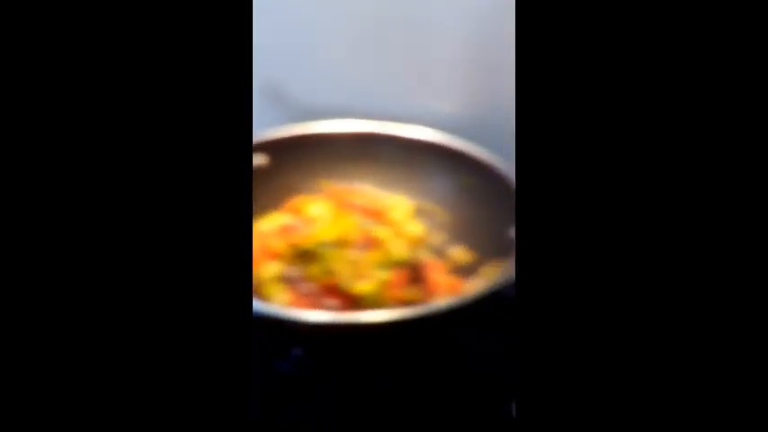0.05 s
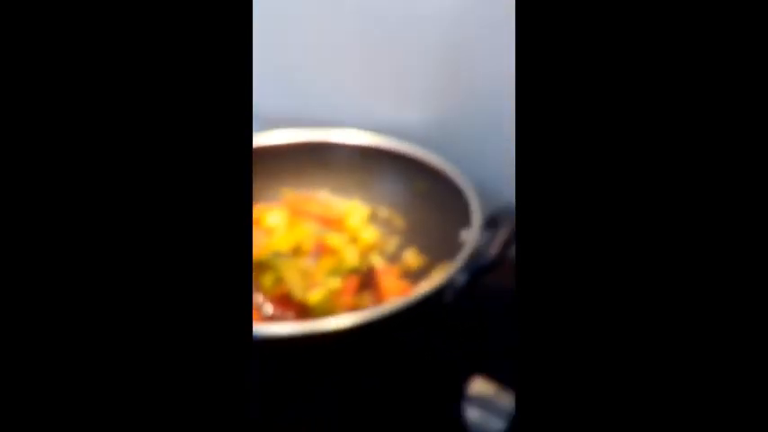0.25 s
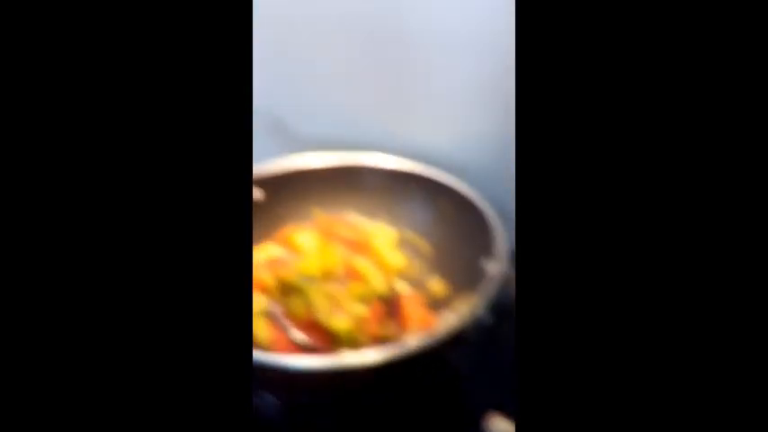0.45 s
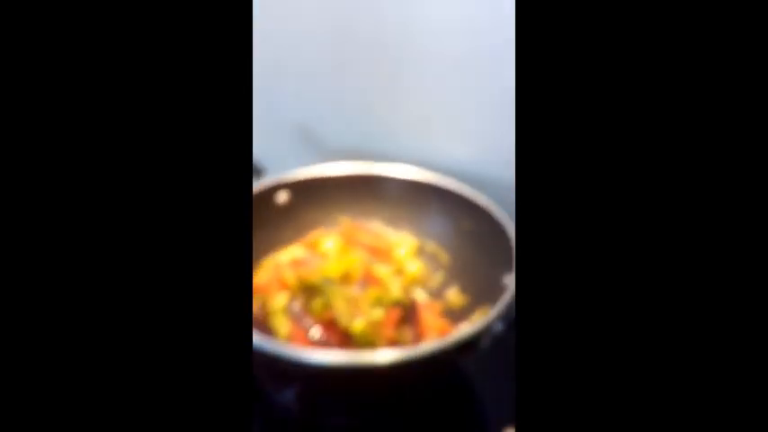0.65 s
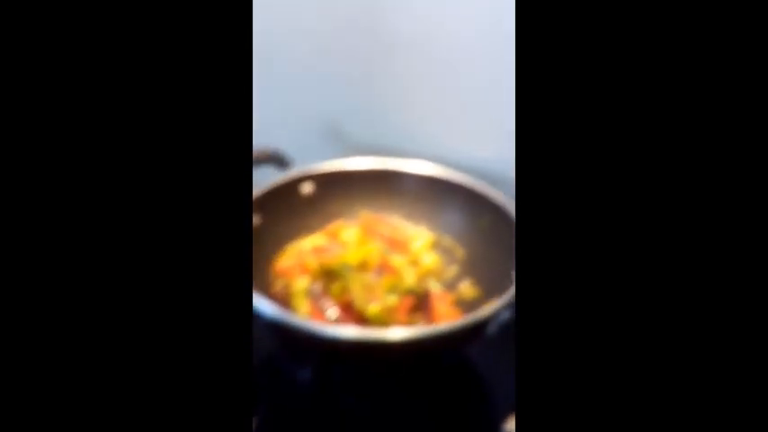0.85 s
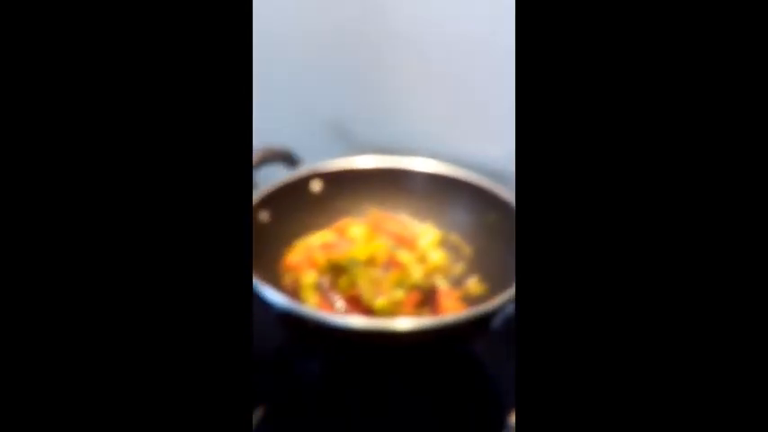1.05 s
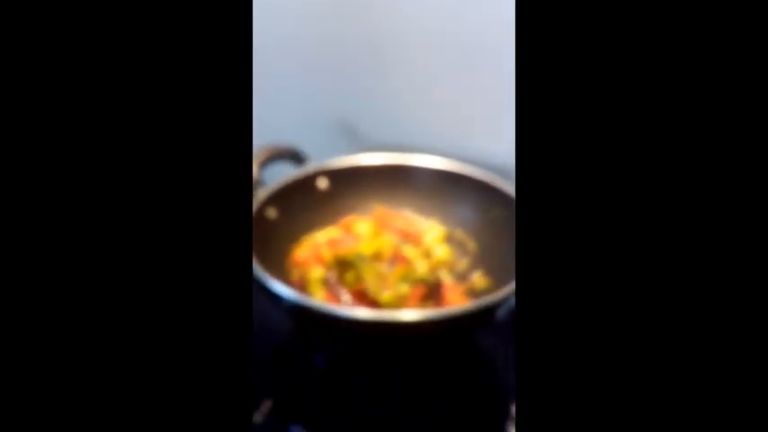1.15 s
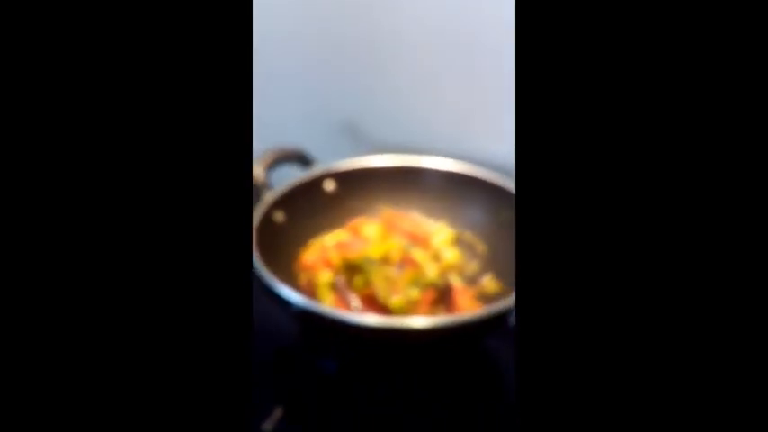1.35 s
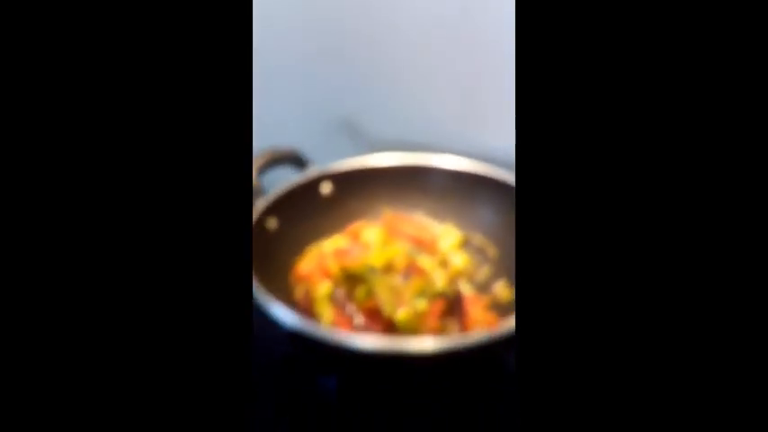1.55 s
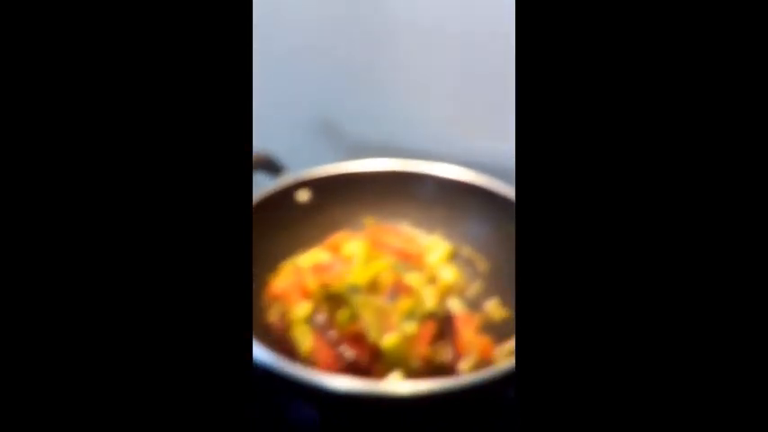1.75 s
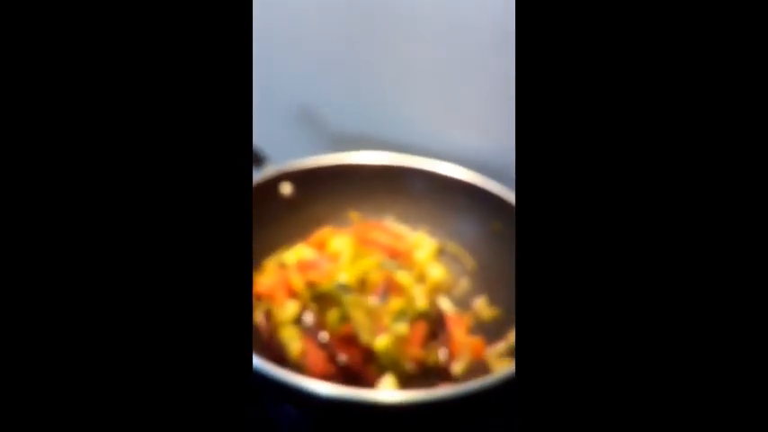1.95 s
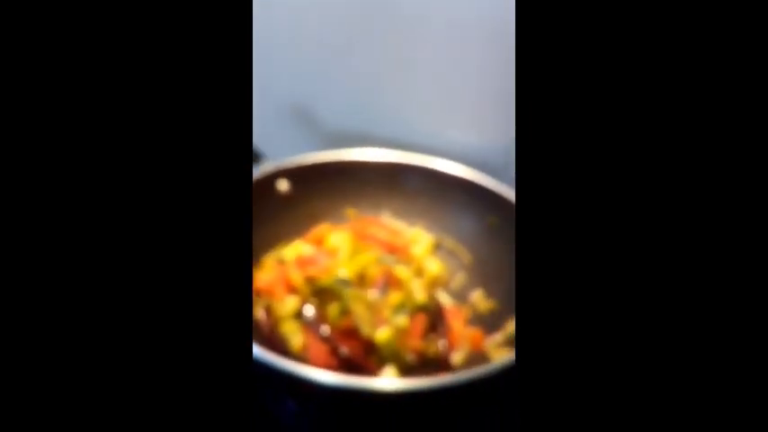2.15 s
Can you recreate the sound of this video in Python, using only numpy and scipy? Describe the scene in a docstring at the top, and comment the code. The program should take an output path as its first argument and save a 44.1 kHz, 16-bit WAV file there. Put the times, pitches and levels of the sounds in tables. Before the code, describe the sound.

Over quiet steady frying and a low burner flutter, a metal lid strikes the pan early, clattering and ringing for about half a second, then a small oil spit and soft scuffs, in a small, live kitchen.

```python
"""In a small kitchen, a steel lid clangs on the rim of a pan: one edge lands, then the other, and the metal rings.
The clang mixes short bursts of noise with many fading sine waves, and the room answers each hit.
Vegetables sizzle steadily (noise plus tiny pops) over the low flutter of the burner (deep noise).
The oil spits once, as three quick bursts, and a few soft scuffs swell up as narrow bands of noise.
The two microphone ports differ in colour: the left one hears more of the sizzle band."""
import sys
import numpy as np
from scipy import signal
from scipy.fft import rfft, irfft, next_fast_len
from scipy.io import wavfile
from scipy.ndimage import uniform_filter1d, minimum_filter1d, map_coordinates

SR = 44100
rng = np.random.default_rng(int(sys.argv[2]) if len(sys.argv) > 2 else 0)


def to_wav(sig):
    """Store sig (one row per channel, or 1-D mono) as 16-bit WAV at the path in sys.argv[1].

    Samples outside -1..1 are clipped; the rate is SR.
    """
    pcm = np.clip(np.atleast_2d(sig), -1, 1) * 32767
    pcm = np.round(pcm).astype(np.int16)
    wavfile.write(sys.argv[1], SR, pcm.T)  # frames by channels


N = 97020
TIME = np.arange(N) / SR  # seconds


def amp(db):
    """Turn decibels into a multiplier."""
    return 10 ** (np.asarray(db) / 20)


def unit(x):
    """Scale a sound to an average strength (rms) of 1."""
    return x / np.sqrt(np.mean(x ** 2) + 1e-20)


def along(points, hz):
    """Read a curve of (f/Hz, value) points, with pitch spaced as the ear hears it (log axis)."""
    f, value = np.transpose(points)
    return np.interp(np.log(hz + 1), np.log(f + 1), value)


def over_time(points):
    """Read a curve of (t/s, value) points at every sample."""
    return np.interp(TIME, *np.transpose(points))


def filtered(x, response):
    """Make each frequency stronger or weaker, or shift it, as response(hz) says."""
    size = next_fast_len(N + SR // 2)
    hz = np.fft.rfftfreq(size, 1 / SR)
    return irfft(rfft(x, size) * response(hz), size)[..., :N]


def noise(spectrum):
    """Random hiss coloured by a spectrum, rms 1."""
    return unit(filtered(rng.standard_normal(N), lambda hz: amp(along(spectrum, hz))))


def fade(t, t60):
    """Die away smoothly, losing 60 dB in t60 seconds."""
    return np.exp(-np.log(1000) * t / t60)


def add(out, start_s, x):
    """Mix x into out from start_s seconds on."""
    i = round(start_s * SR)
    out[..., i:i + x.shape[-1]] += x[..., :N - i]


def wobble(rate):
    """A smooth random curve through `rate` random points a second."""
    knots = rng.standard_normal(int(N * rate / SR) + 4)
    return map_coordinates(knots, [np.arange(N) * rate / SR])


def wide(make, side_db):
    """Give the ports a shared sound plus a second one with opposite sign in each."""
    return make() + amp(side_db) * np.outer([1, -1], make())


def lagged(pair, lag_s):
    """The sound reaches the right port first, by lag_s seconds."""
    return filtered(pair, lambda hz: np.exp(1j * np.pi * lag_s * np.outer([-1, 1], hz)))


# how long the room rings at each pitch: f/Hz, t60/s
ROOM_DECAY = [(150, 0.48), (1000, 0.59), (4000, 0.63), (7000, 0.48), (12000, 0.15)]
WALL_DB, WALL_T60 = -6, 0.046  # quick answer of stove top and back wall: relative level/dB, t60/s
ROOM_DB = -4.5  # room level used for spits, scuffs and the sheet metal
PORT_LAG_S, LID_LAG_S = 0.00015, .00001


def kitchen(x, room_db, lag_s):
    """Direct sound, a quick answer from nearby surfaces and a soft random tail for each port."""
    hz, t, z = signal.stft(rng.standard_normal((2, SR * 3 // 4)), SR, nperseg=256)
    decay = fade(t, along(ROOM_DECAY, hz)[:, None])
    tail = signal.istft(z * decay, SR, nperseg=256)[1]
    wall = rng.standard_normal(tail.shape) * fade(np.arange(tail.shape[1]) / SR, WALL_T60)
    answer = tail / np.linalg.norm(tail[0]) + amp(WALL_DB) * wall / np.linalg.norm(wall[0])
    late_answer = np.pad(answer, ((0, 0), (SR // 800, 0)))  # starts about 1/800 s late
    pair = x * np.ones((2, 1))
    wet = signal.fftconvolve(pair, late_answer, axes=1)[:, :N]
    return lagged(pair, lag_s) + amp(room_db) * wet


# colour of the burner's rumble: f/Hz, relative level/dB
BURNER_COLOUR = [(20, -14), (45, -25), (78, 1), (100, -0.5), (125, -6.5), (200, -15.5), (400, -53.5)]
# rise and fall of the burner: t/s, level/dB (before BURNER_DB)
BURNER_COURSE = [(0.0, -66.5), (0.12, -68.5), (0.22, -61), (1.19, -69), (1.25, -69), (1.41, -61),
                 (1.46, -73), (1.59, -61.5), (1.73, -66), (1.82, -60.5), (2.1, -68.5), (2.2, -56.5)]
BURNER_DB, FLUTTER_DB = 0.5, 1


def burner(side_db=-8):
    """A low fluttering rumble of deep noise, nearly alike in both ports."""
    level_db = BURNER_DB + over_time(BURNER_COURSE) + FLUTTER_DB * wobble(7.8)
    return amp(level_db) * wide(lambda: noise(BURNER_COLOUR), side_db)


# colour of the sizzle: f/Hz, relative level/dB
SIZZLE_COLOUR = [(120, -14), (200, -17), (300, -8), (480, -14.5), (670, -17.5), (850, -14.5), (1260, -8.5),
                 (1550, -12.5), (2250, -4.5), (3400, -3), (4550, 1), (6400, -8.5), (7200, -18.5),
                 (8100, -33), (14000, -36), (15300, -55)]
# slow course of the sizzle: t/s, level/dB (before SIZZLE_DB)
SIZZLE_COURSE = [(0, -53), (.7, -53.5), (1.2, -54.5), (1.7, -53.5), (2.2, -53)]
# how alike the two ports hear it: f/Hz, likeness (1 the same, 0 or less unrelated)
SIZZLE_LIKENESS = [(60, 0.83), (150, 0.54), (380, 0.31), (940, 0.36), (2350, -0.26), (5890, 0.16),
                   (14700, 0.02)]
SIZZLE_DB = -0.5
FIZZ_DB, FIZZ_PER_S = -5.5, 900  # the pops: level against the hiss, average count in each port


def sizzle():
    """Countless tiny bursting bubbles: a hiss with a finer grain of single pops."""
    is_pop = rng.random((2, N)) < FIZZ_PER_S / SR
    pops = is_pop * rng.standard_normal((2, N))
    grain = rng.standard_normal((2, N)) + amp(FIZZ_DB) * unit(pops)

    def shared_and_opposite(hz):
        """Split each pitch into a part shared by the ports and a part opposite in them."""
        turn = np.arccos(np.clip(along(SIZZLE_LIKENESS, hz), 0, 1)) / 2
        return amp(along(SIZZLE_COLOUR, hz)) * [np.cos(turn), np.sin(turn)]

    mid, side = filtered(grain, shared_and_opposite)
    pair = lagged(np.array([mid + side, mid - side]), PORT_LAG_S)
    level_db = SIZZLE_DB + over_time(SIZZLE_COURSE) + 0.11 * wobble(19)
    return amp(level_db) * unit(pair)


# soft scuffs: t/s of the peak, length/s (bell curve), centre f/Hz, width/octaves (bell curve), level/dB
SCUFF_SWELLS = [(1.445, 0.029, 666, 0.16, -70), (1.51, 0.044, 610, 0.19, -67.5),
                (1.472, .035, 4100, 0.13, -57.5), (1.76, 0.044, 1410, 0.44, -63)]


def scuffs():
    """Soft swells of noise, each kept to a narrow band of pitch."""
    out = np.zeros(N)
    for peak_s, length, centre_hz, width, db in SCUFF_SWELLS:
        def narrow(hz):
            octaves = np.log2((hz + 1) / centre_hz)
            return np.exp(-.5 * (octaves / width) ** 2)
        band = filtered(rng.standard_normal(N), narrow)
        swell = np.exp(-.5 * ((TIME - peak_s) / length) ** 2)
        out += amp(db) * unit(band) * swell
    return kitchen(out, ROOM_DB, PORT_LAG_S)


# bursts of oil: t/s, level/dB at the start
SPIT_BURSTS = [(0.7837, -37), (0.7942, -53), (.8001, -47.5)]
# colour of a burst: f/Hz, relative level/dB
SPIT_COLOUR = [(500, -38), (1500, -14), (2300, 9.5), (3200, -10), (4500, 8.5), (6500, -13), (8000, -30),
               (12000, -33), (15000, -51)]
SPIT_T60 = 0.016  # seconds


def spits():
    """Larger drops burst in the hot oil: noise that dies away almost at once."""
    out = np.zeros(N)
    for start_s, db in SPIT_BURSTS:
        add(out, start_s, amp(db) * noise(SPIT_COLOUR) * fade(TIME, SPIT_T60))
    return kitchen(out, ROOM_DB, LID_LAG_S)


RISE_S = 0.00016  # time scale on which a struck sound swells up


def rise(t):
    """The very short swell at the start of a struck sound."""
    return 1 - np.exp(-t / RISE_S)


def bright(hz, tilt_db):
    """A harder contact excites more treble: tilt in dB per octave around 3000 Hz."""
    return amp(tilt_db * np.log2(np.clip(hz, 800, 7000) / 3000))


# contacts of lid and rim, also used by clang: t/s, strength level/dB, treble tilt/(dB per octave)
HITS = [(0.2358, -1.5, 0.5), (0.2468, -2, -4), (0.249, 0.5, -1.5), (.2560, -14, 0)]
# clear ringing tones (modes) of the lid: f/Hz, relative level/dB, t60/s
LID_MODES = [(1006, -7, .4), (1224, -11, .42), (1280, -12, .46), (1399, -11, .46), (1517, -9, .48),
             (2267, 5, .27), (2514, -5, .3), (2460, -7, .4), (3402, -5, .33), (3736, -7, .42),
             (3830, -6, .48), (3966, -3, .68), (4058, -4, .48), (4412, -8, .46), (5540, -15, .33),
             (5988, -1, .35), (6049, -4, .33)]
# thin overtones of the rim: f/Hz, relative level/dB, t60/s
RIM_MODES = [(7472, -4, .33), (7790, -5, .25), (8333, -2, .36), (8646, -1, .36), (9420, 0, .33),
             (9835, 0, .32), (10820, 0, .28), (11840, -3, .22), (13600, -2, .17)]
LID_DB, RIM_DB, RING_ROOM_DB = -27.5, -50, -15
WAVER_DB, WAVER_TURNS, WAVER_PER_S = 2.5, 0.2, 40.22  # in level, in phase, random points a second
PORT_TURNS = 0.24  # scale of the random phase shift, opposite in the two ports


def lid():
    """Each contact adds energy to the clear modes, which waver as the lid settles."""
    out = np.zeros((2, N))
    for modes, level_db in (LID_MODES, LID_DB), (RIM_MODES, RIM_DB):
        for hz, db, t60 in modes:
            energy = 0
            for start_s, strength_db, tilt_db in HITS:
                age = np.maximum(TIME - start_s, 0)
                push = amp(strength_db) * bright(hz, tilt_db)
                energy += (push * fade(age, t60) * rise(age)) ** 2
            port_shift = PORT_TURNS * rng.uniform(-1.14, 1) * np.array([[1], [-1]])
            turns = hz * TIME + WAVER_TURNS * wobble(WAVER_PER_S) + port_shift
            level = amp(level_db + db + WAVER_DB * wobble(WAVER_PER_S))
            out += level * np.sqrt(energy) * np.sin(2 * np.pi * turns)
    return kitchen(out, RING_ROOM_DB, LID_LAG_S)


def ring(hz, gain, t60):
    """Struck metal: half a second of fading sine waves with random phase and a very short rise."""
    t = np.arange(SR // 2, dtype=np.float32) / SR
    phase = rng.uniform(0, 2 * np.pi, len(hz))
    # one row per tone; float32 saves memory
    speed, phase, life = (np.float32(v)[:, None] for v in (2 * np.pi * hz, phase, t60))
    tones = np.sin(speed * t + phase) * np.exp(-np.float32(np.log(1000)) * t / life)
    return np.float32(gain) @ tones * rise(t)


# the crowd of weaker sheet-metal modes: f/Hz, relative level/dB
SHEET_COLOUR = [(120, -42), (400, -18.5), (750, -17.5), (1100, -6), (1700, -8), (2400, -1.5), (3100, -6),
                (4000, -2.5), (5200, -9), (6200, -7.5), (7300, -23.5), (9000, -50), (14000, -60)]
# how long the crowd rings: f/Hz, t60/s
SHEET_DECAY = [(200, 0.12), (1200, 0.24), (4000, 0.16), (6500, 0.19), (12000, .1)]
# colour of each contact's crack: f/Hz, relative level/dB
CRACK_COLOUR = [(100, -18.5), (450, -3.5), (1500, -7), (2350, 7.5), (3100, -0.5), (4200, 10), (5200, -16),
                (6150, 13.5), (7400, -29), (11000, -20), (14000, -46), (15000, -53)]
# thud of the pan on its stand: f/Hz, level/dB (before contact strength), t60/s
PAN_MODES = [(162, -40, .16), (191, -39, .15), (287, -47, .12), (385, -43, .12), (510, -47, .1)]
SHEET_DB = -21.5
CRACK_DB, CRACK_T60, CRACK_ROOM_DB = -12, 0.054, -13  # t60 in seconds


def clang(count=300, side_db=-5):
    """Every contact cracks, shakes the sheet modes and thuds the pan; the sheet radiates unevenly to the ports."""
    body, crack = np.zeros((2, 2, N))
    pan_hz, pan_db, pan_t60 = np.transpose(PAN_MODES)
    # scatter the modes at random, denser toward the low end
    place = (np.arange(count) + rng.random(count)) / count
    crowd_hz = 250 + 14000 * place ** 1.5
    crowd_t60 = along(SHEET_DECAY, crowd_hz)
    share = amp(along(SHEET_COLOUR, crowd_hz))
    share /= np.linalg.norm(share)
    for start_s, db, tilt_db in HITS:
        crowd_gain = amp(SHEET_DB + db) * share * bright(crowd_hz, tilt_db)
        add(body, start_s, wide(lambda: ring(crowd_hz, crowd_gain, crowd_t60), side_db))
        add(body, start_s, ring(pan_hz, amp(pan_db + db), pan_t60))

        def burst():
            """Noise in the colour of this contact."""
            return filtered(rng.standard_normal(N),
                            lambda hz: amp(along(CRACK_COLOUR, hz)) * bright(hz, tilt_db))

        shape = fade(TIME, CRACK_T60) * rise(TIME)
        add(crack, start_s, amp(CRACK_DB + db) * wide(burst, side_db) * shape)
    return kitchen(body, ROOM_DB, LID_LAG_S) + kitchen(crack, CRACK_ROOM_DB, LID_LAG_S)


def scene():
    """The lid over the cooking sounds."""
    return burner() + sizzle() + scuffs() + spits() + lid() + clang()


# colour difference of the microphone ports: f/Hz, left minus right level/dB
PORT_COLOUR = [(100, .5), (700, 0.5), (1300, 2.5), (2400, 5), (4400, 9.5), (5500, 9.5), (6500, 4),
               (8500, -1.5), (13000, -2.5)]
CEILING, TOP_HZ = .85, 15300  # limiter peak (full scale is 1), band limit


def record(dry):
    """Each port has its own colour; a limiter holds the highest peaks; nothing is kept above the band limit."""
    x = filtered(dry, lambda hz: amp(np.outer([.5, -.5], along(PORT_COLOUR, hz))))
    needed = np.minimum(1, CEILING / (np.abs(x).max(axis=0) + 1e-9))
    # turn down around each peak, then smooth the change
    gain = uniform_filter1d(minimum_filter1d(needed, size=129), size=129)
    return filtered(x * gain, lambda hz: hz < TOP_HZ)


dry = scene()
out = record(dry)
to_wav(out)
```